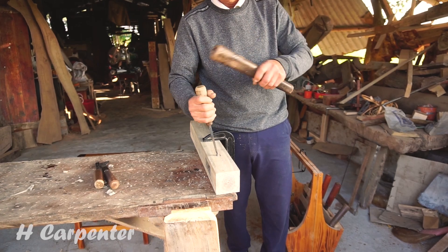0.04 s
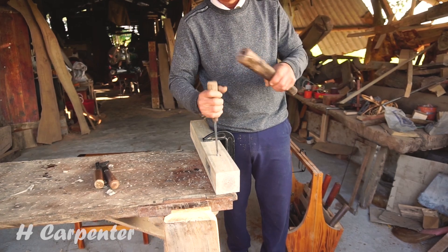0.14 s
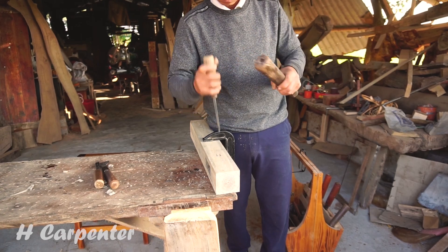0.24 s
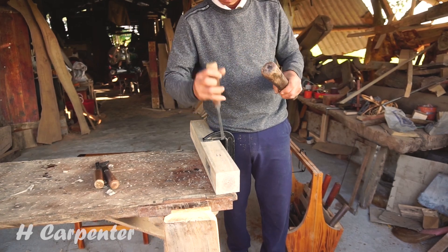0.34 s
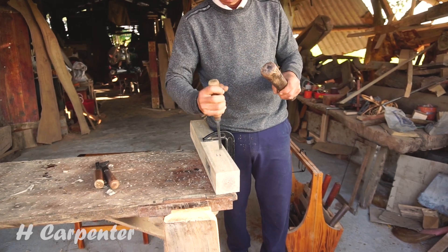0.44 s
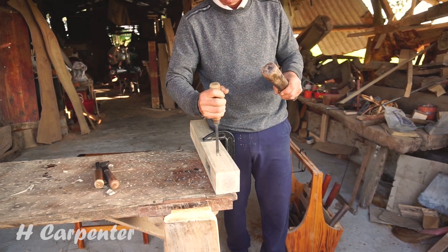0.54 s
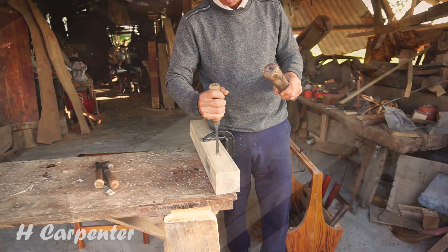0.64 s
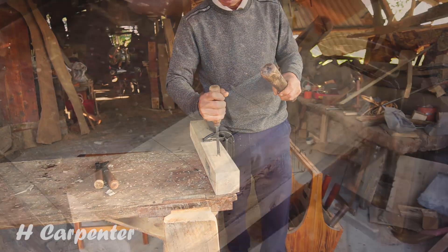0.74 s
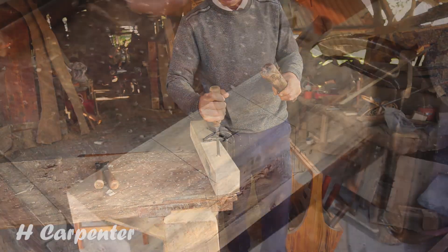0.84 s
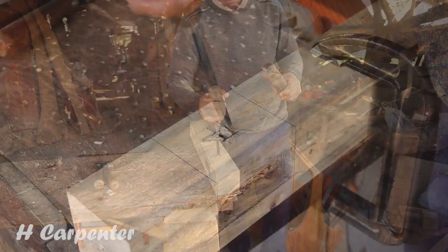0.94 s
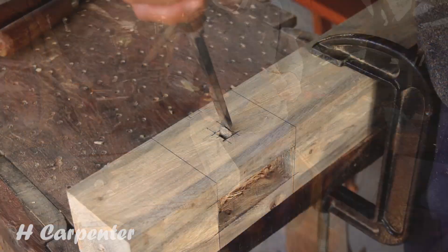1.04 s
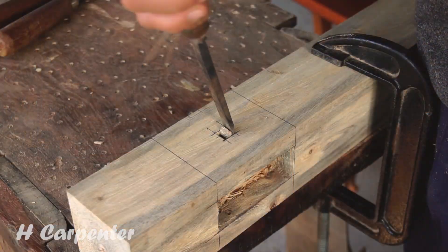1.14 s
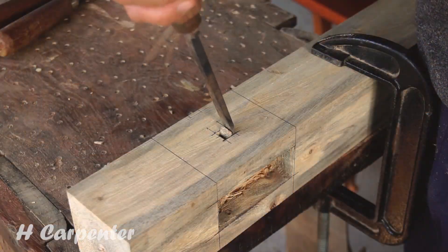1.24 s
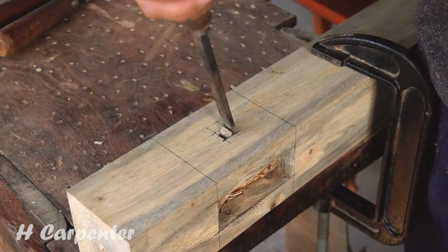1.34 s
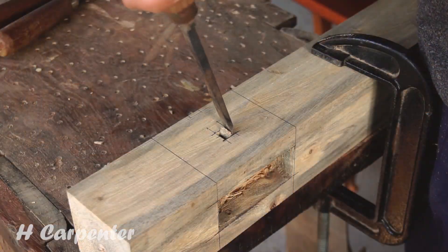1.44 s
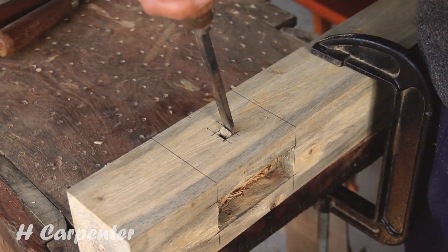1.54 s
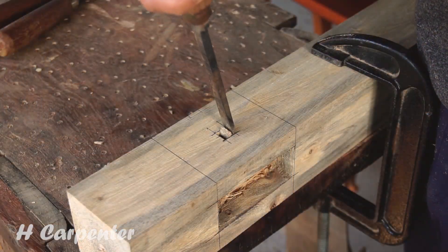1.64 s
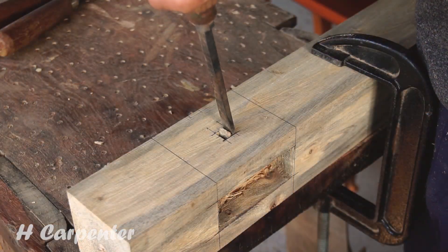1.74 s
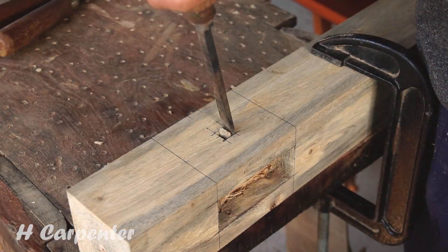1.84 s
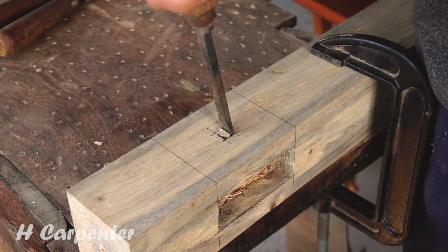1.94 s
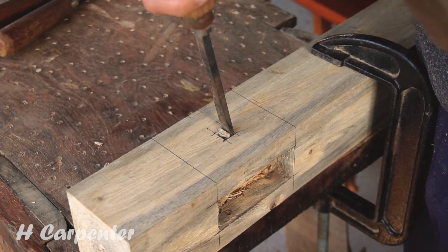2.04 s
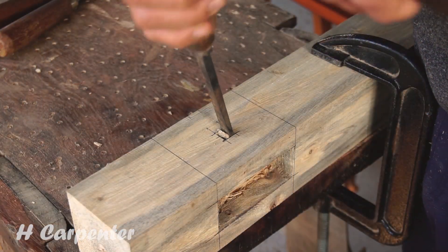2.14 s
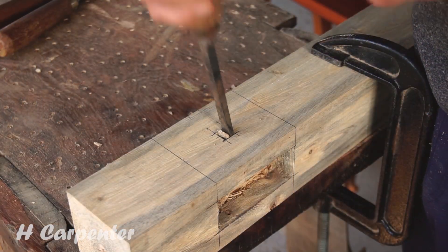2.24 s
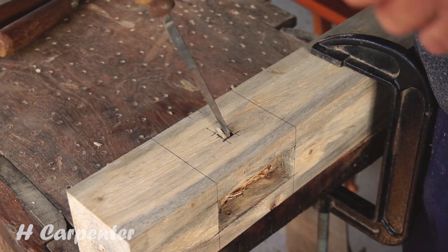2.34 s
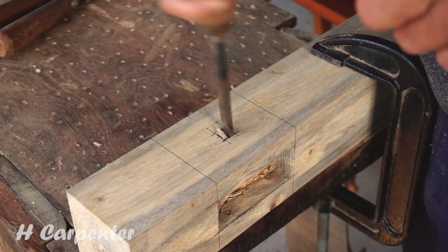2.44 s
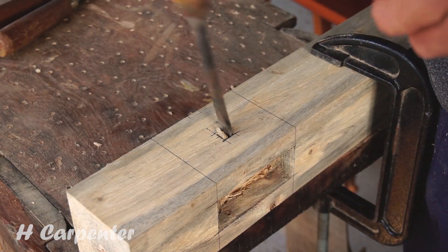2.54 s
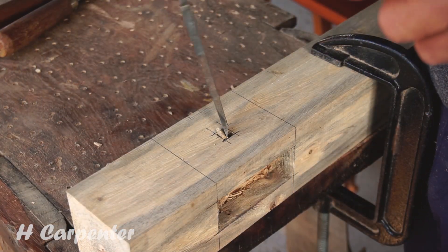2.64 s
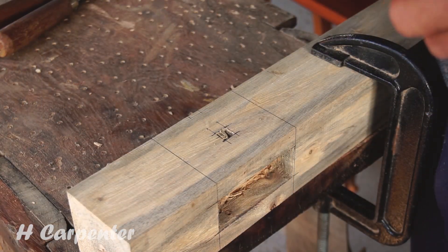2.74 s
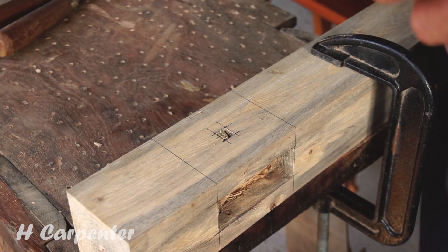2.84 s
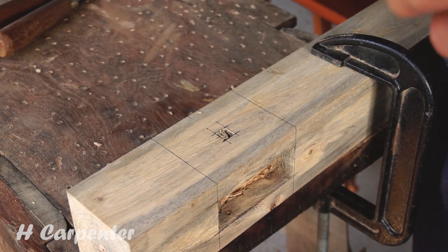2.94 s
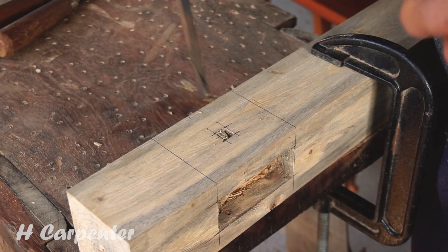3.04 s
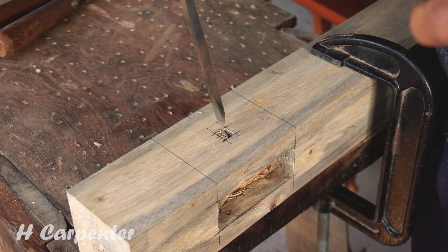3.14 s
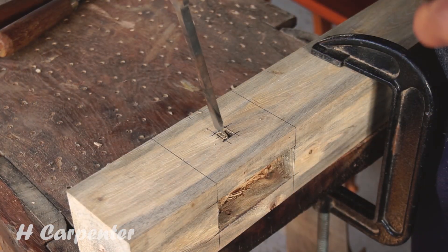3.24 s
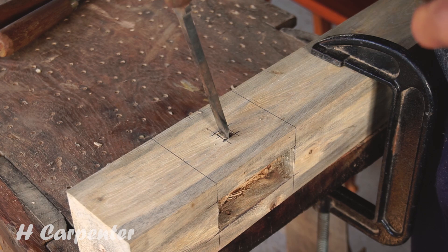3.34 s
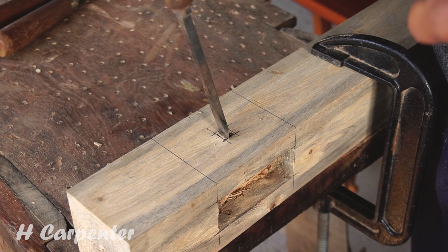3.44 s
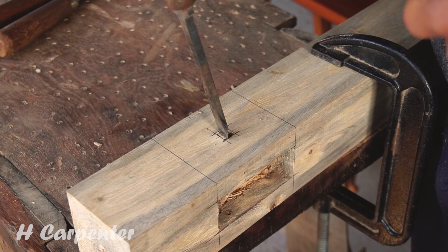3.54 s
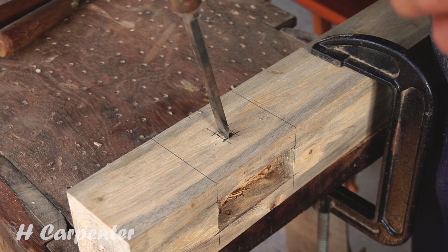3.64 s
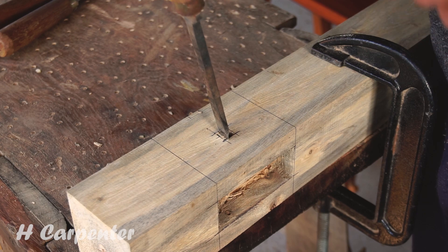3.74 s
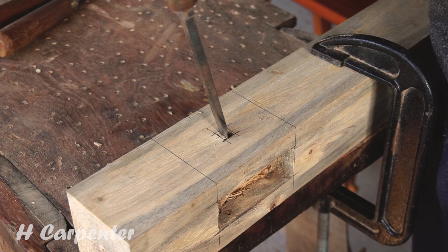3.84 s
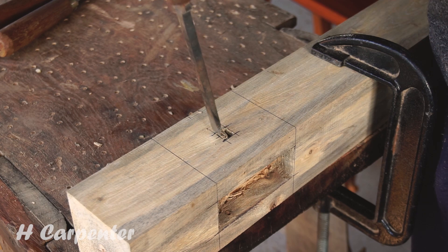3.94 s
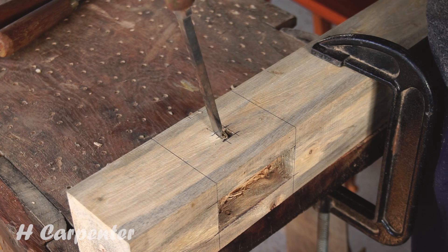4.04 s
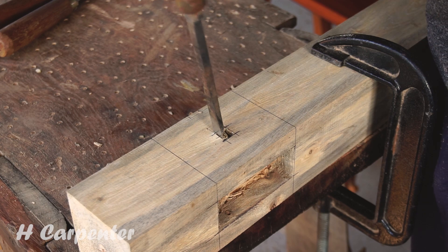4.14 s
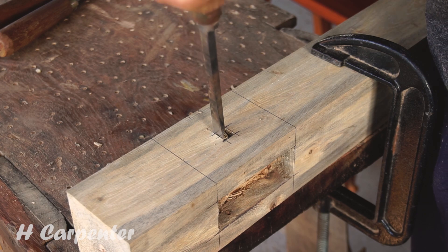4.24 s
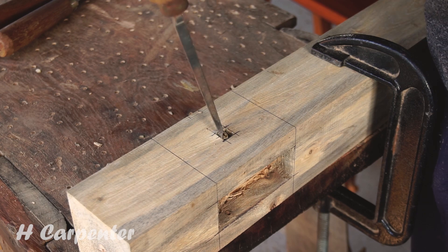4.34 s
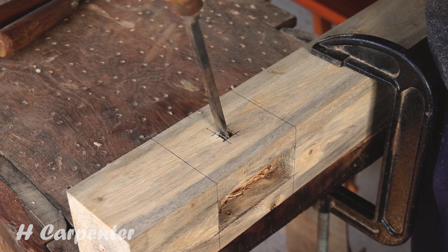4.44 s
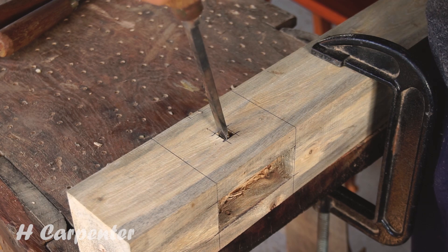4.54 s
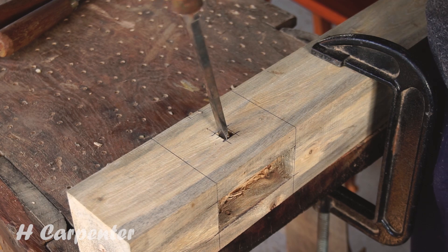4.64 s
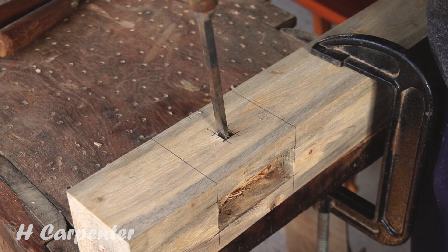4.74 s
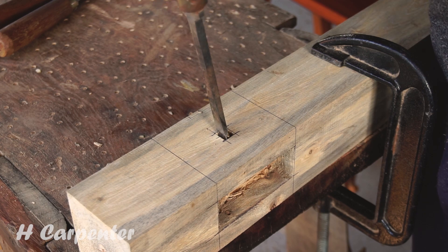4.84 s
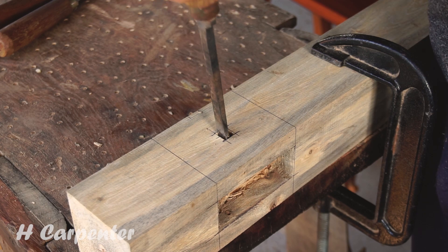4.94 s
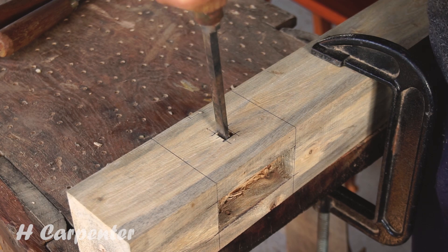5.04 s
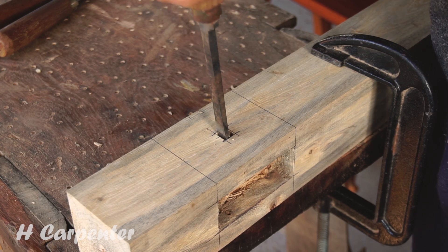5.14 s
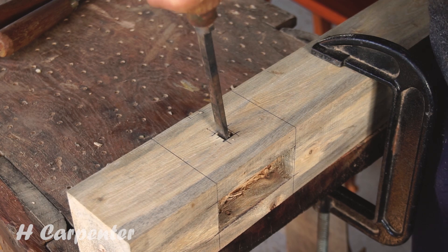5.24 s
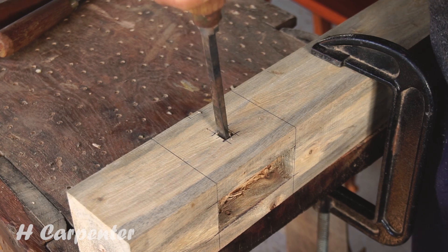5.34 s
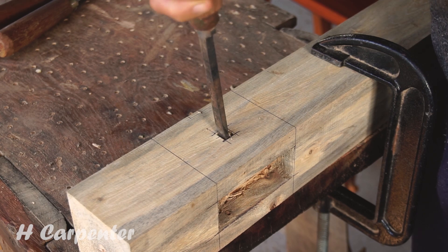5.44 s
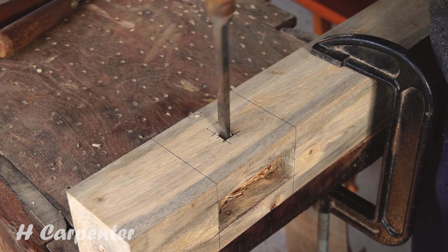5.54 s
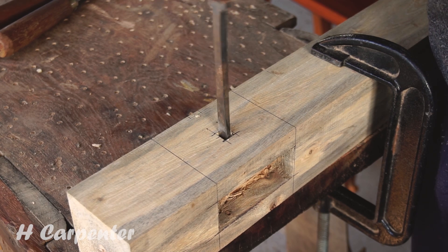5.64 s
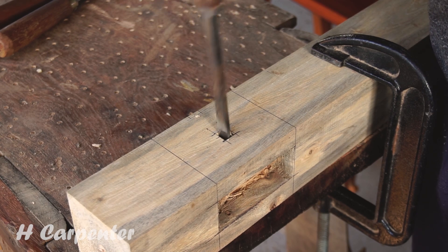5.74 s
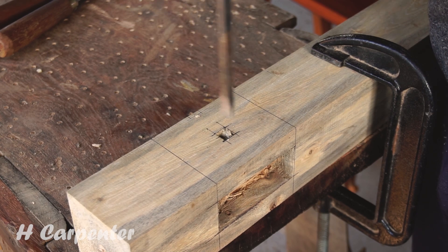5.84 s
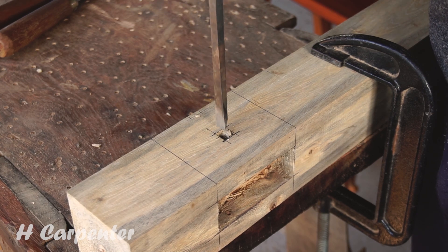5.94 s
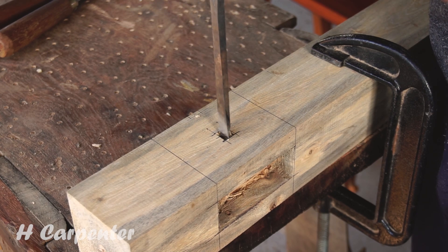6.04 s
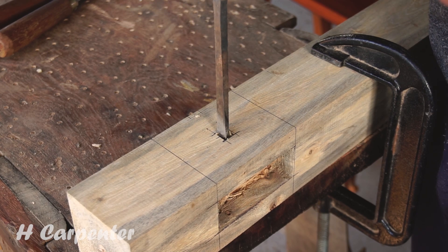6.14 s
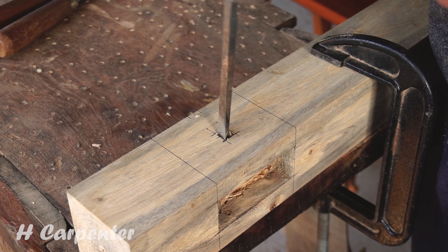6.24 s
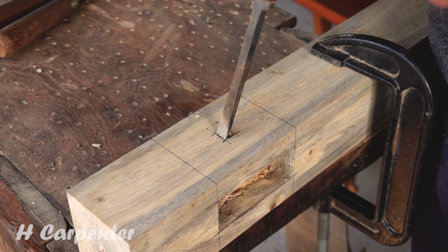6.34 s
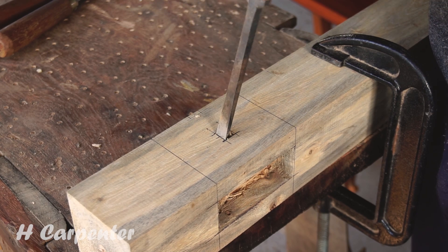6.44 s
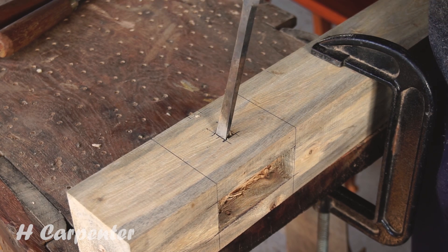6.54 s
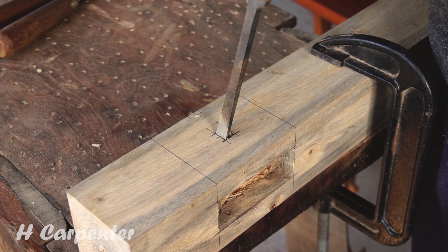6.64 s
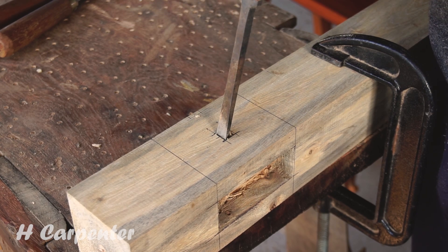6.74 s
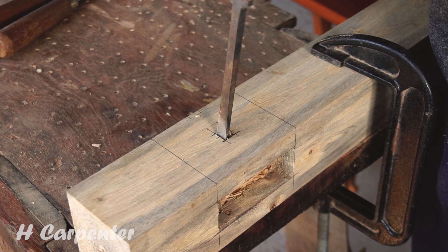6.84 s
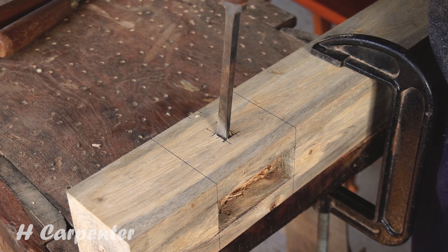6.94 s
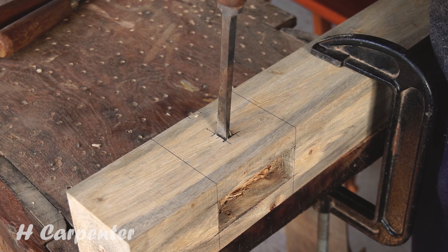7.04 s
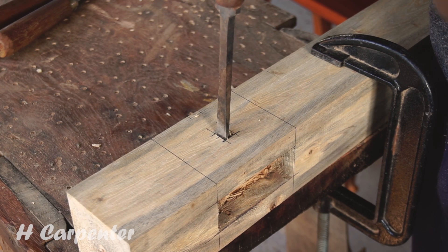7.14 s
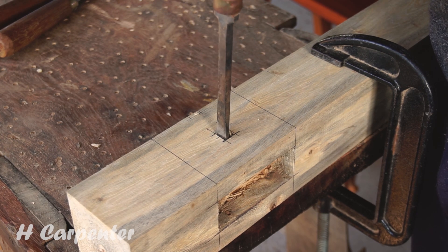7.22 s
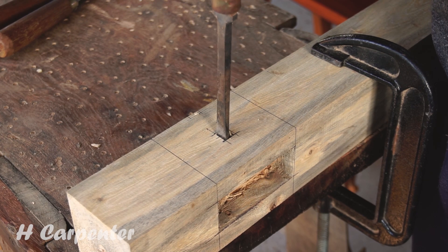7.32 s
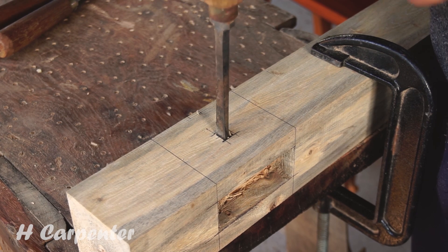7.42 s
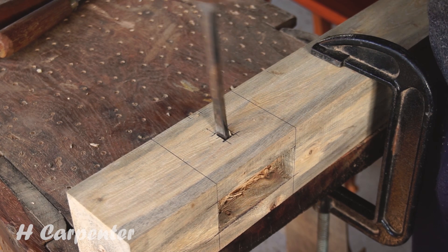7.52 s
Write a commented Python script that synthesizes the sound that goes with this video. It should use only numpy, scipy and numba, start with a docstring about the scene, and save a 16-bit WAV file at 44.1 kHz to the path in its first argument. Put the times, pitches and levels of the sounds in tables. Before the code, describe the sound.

Close in an open wooden barn, the tail of a mallet blow on a chisel rings out, then light ticks and faint scrapes. Three sharp woody cracks follow quickly with a low bench thump, then the blade is loosened with clicks. Another trio comes later, then rustling as the blade is worked, and a last trio. Small birds chirp faintly outside over a soft rumble and hiss.

```python
"""A wooden mallet drives a chisel into a clamped timber on a bench in an open barn, mostly three blows at a time.
Each blow excites damped modes of blade and timber, a noisy crack and rattle, and late, low bench modes.
Between blows the blade is set and levered, as ticks, soft knocks and friction noise. Small birds are gliding
near-sines outside; decaying noise forms the barn's echoes, and filtered noise the distant rumble and hiss.
A microphone's preamp saturates and its limiter holds down each blow."""
import sys
import numpy as np
from scipy import signal
from scipy.io import wavfile
from scipy.ndimage import uniform_filter1d
from numba import njit

SR = 44100
rng = np.random.default_rng(int(sys.argv[2]) if len(sys.argv) > 2 else 0)


def generate_wav(signal):
    """Clip the signal to [-1, 1] and save it as 16-bit WAV at the path in sys.argv[1]."""
    frames = np.transpose(np.atleast_2d(signal))
    scaled = np.clip(frames, -1, 1) * 32767
    pcm = np.round(scaled).astype(np.int16)
    wavfile.write(sys.argv[1], SR, pcm)


N = 334278
LEAD = SR // 4  # samples rendered ahead, for a blow struck just before the start


def undb(db):
    """Logarithmic level: the amplitude gain of a level in dB."""
    return 10 ** (np.asarray(db) / 20)


def band(x, hz, width_hz):
    """Resonant selection: band-pass around hz."""
    low = max(hz - width_hz / 2, hz / 4)
    top = min(hz + width_hz / 2, .45 * SR)
    return signal.sosfilt(signal.butter(2, [low, top], "band", fs=SR, output="sos"), x)


def ring(modes, scatter_db, size):
    """Modal superposition: one impulse starts decaying sines, with random level and slight detuning."""
    t = np.arange(size) / SR
    hz, db, t60 = np.transpose(modes)[:, :, None]
    level_luck, pitch_luck = rng.standard_normal((2, len(modes), 1))
    decay = undb(db + scatter_db * level_luck - 60 * t / t60)
    return np.sum(decay * np.sin(2 * np.pi * hz * (1 + .006 * pitch_luck) * t), axis=0)


def push(ms):
    """Contact stiffness: a smooth force pulse of unit area; longer is duller."""
    force = np.hanning(max(int(ms * SR / 1000), 1) + 2)[1:-1]
    return force / force.sum()


def grains(size, grain, scatter_db):
    """Intermittent contact: noise in short grains of very uneven size, rms 1."""
    sizes = np.minimum(rng.exponential(size=size // grain + 1), 3)
    x = rng.standard_normal(size) * undb(scatter_db * np.repeat(sizes, grain)[:size])
    return x / x.std()


def walk(rate):
    """Slow random modulation: levels held 1 / rate s and smoothed twice."""
    k = int(SR / rate)
    steps = np.repeat(rng.standard_normal(N // k + 1), k)
    return 1.3 * uniform_filter1d(uniform_filter1d(steps, k), k)[:N]


def add(out, s, sound):
    """Linear superposition: mix a sound in at time s."""
    i = LEAD + int(s * SR)
    out[i:i + len(sound)] += sound[:len(out) - i]


# mallet blows: start_s [s], force_db [dB], thump_db of the bench [dB, before a 3 dB cut],
# knock_db of the timber [dB relative to force]
BLOWS = [(-.075, 9, -7, -2), (1.7369, -2, -10, -5.5), (1.970, 4.5, 2, -4.5), (2.1501, 3.5, 0.5, 1),
         (5.0929, -4.5, -7, -2.5), (5.3241, 6.5, 1.5, -6), (5.522, 7.5, 3.5, -3), (7.0266, -11, -7.5, 4),
         (7.2466, 0.5, -7.5, -9), (7.468, 5.5, 3, -3)]
BLADE_DB = 4.5  # against the force


def mallet():
    """Impact excitation: blade, timber and crack sound at once, the rattle builds and the bench swells late."""
    near, spread, bench = np.zeros((3, N + LEAD))
    size = SR // 3
    t = np.arange(size) / SR
    for s, force_db, thump_db, knock_db in BLOWS:
        blade = undb(BLADE_DB) * ring(BLADE, 2.0, size)
        onset = np.clip((t - .0015) / 0.00076, 0, 1)  # the shock takes a moment to reach the timber
        knock = undb(knock_db) * onset * ring(TIMBER, 2.5, size)
        crack = undb(-12 - 60 * t / .012) * rng.standard_normal(size)
        loose = rattle(t)
        direct = blade + knock + crack + undb(-5.5) * loose
        to_barn = undb(-16.5) * blade + undb(-10.5) * knock + undb(-21) * loose
        add(near, s, undb(force_db) * direct)
        add(spread, s, undb(force_db) * to_barn)
        add(bench, s, undb(thump_db - 3) * bench_thump(t))
    return near, spread, bench


# modes of the struck blade: pitch_hz [Hz, nominal], level_db [dB relative], t60_s [s]
BLADE = [(3990, 4, 0.014), (3640, -4, 0.022), (4060, -26, .12), (4800, -14, 0.035), (6284, -6, 0.013),
         (7045, -19, .05), (8600, -30, 0.04), (10900, -21, 0.03)]
RATTLE_S, RATTLE_HOLD = 0.061, 2.3  # time to fall 8 dB; how abruptly the rattle ends
CONTACT_MS = .2
SHIVER_DB, SHIVER_TILT_DB = -11, -7  # blade kept ringing by the rattle; tilt per octave above 4 kHz


def rattle(t):
    """Repeated micro-impacts: fibres tear, loose things hop and land, and the blade is kept ringing."""
    hops = grains(len(t), grain=60, scatter_db=3.2)
    hops = hops * undb(-8 * (t / RATTLE_S) ** RATTLE_HOLD) * np.minimum(t / 0.012, 1)
    shiver = 0
    for hz, _, _ in BLADE:
        mode_db = 4.5 * rng.standard_normal() + SHIVER_TILT_DB * np.log2(hz / 4000)
        shiver = shiver + undb(mode_db) * band(hops, hz, 160)
    softened = np.convolve(hops, push(CONTACT_MS))[:len(t)]
    hiss = undb(-23.0) * band(hops, 9800, 5700) + undb(-30.5) * hops
    return softened + undb(SHIVER_DB) * shiver + hiss


# modes of the bench: pitch_hz [Hz, nominal], level_db [dB relative], t60_s [s]
BENCH = [(123.9, 3, 0.35), (106.4, -5.5, 0.35), (166.6, -12, 0.47), (210.3, -9, 0.38)]


def bench_thump(t):
    """Delayed structural response: low bench modes swell after the blow."""
    swell = np.clip((t - .025) / 0.058, 0, 1) ** 2
    return swell * ring(BENCH, 1.5, len(t))


# the blade set down, knocked or rebounding: start_s [s], ring_db [dB], pitch_hz of the ring [Hz, nominal],
# click_db [dB relative], knock_db of the timber [dB relative], knock_hz, its colour [Hz]
TAPS = [(0.2189, -43, 3700, -54, -51, 231), (0.5082, -38, 2480, -49, -41, 326),
        (1.222, -39, 3360, -37, -37, 248), (1.262, -43, 6200, -35, -45, 304),
        (1.786, -24, 4790, -28, -19.5, 420), (2.1028, -22.5, 5250, -23, -44, 813),
        (2.2082, -6.5, 2520, -37, -20, 415), (2.7921, -22.5, 6440, -32, -29.5, 1340),
        (2.7994, -11, 2990, -15, -27.5, 590), (3.182, -46, 7100, -42, -54, 231),
        (3.5186, -46, 3650, -43, -48, 342), (3.533, -46, 3700, -57, -51, 353),
        (3.914, -42.5, 3710, -44, -39, 253), (4.345, -37, 3560, -37, -37.5, 240),
        (4.6121, -23.5, 3570, -25.5, -17, 308), (4.807, -33, 3610, -33.5, -21, 423),
        (4.946, -35, 4330, -24, -30.5, 250), (5.5598, -19, 4010, -32, -19, 1380),
        (5.8059, -41, 3830, -58, -36, 240), (5.8263, -34, 3700, -46, -31, 444)]
# modes of the timber, also struck by the mallet: pitch_hz [Hz, nominal], level_db [dB relative], t60_s [s]
TIMBER = [(234.8, -11.5, 0.12), (357.6, -32, 0.018), (467.4, -3, 0.047), (628.4, -1, 0.046),
          (758.4, -17, 0.065), (834, 4.5, 0.022), (1070, 2.5, 0.042), (1210, -1, 0.052),
          (1399, 15.5, 0.013), (1660, 5, 0.027), (1723, -10, 0.13), (2024, 9, 0.015), (2366, 4.5, 0.02),
          (3250, -21.5, 0.0322)]
TICK_T60_S = 0.014
TICK_TAIL_DB, TICK_TAIL_T60_S = -15.5, 0.064  # each tick rings on faintly
CHATTER_S, CHATTER_DB = 0.021, -12.5  # time to fall 8 dB; level against the ring


def ticks():
    """Light contact: small rings and clicks, with chatter convolved through the timber's modes."""
    out, rub = np.zeros((2, N + LEAD))
    size = SR // 6
    t = np.arange(size) / SR
    for s, db, hz, click_db, knock_db, knock_hz in TAPS:
        click = undb(click_db - 60 * t / 0.01) * band(rng.standard_normal(size), 5500, 9500)
        chatter = grains(size, grain=60, scatter_db=2.0) * undb(-8 * (t / CHATTER_S) ** 2)
        drive = chatter / np.sqrt(CHATTER_S * SR)
        timber = signal.fftconvolve(drive, ring(TIMBER, 2.5, size))[:size]
        knock = band(timber, knock_hz, 0.99 * knock_hz) + undb(-8) * band(timber, 1400, 450)
        modes = [(hz, 0, TICK_T60_S), (hz, TICK_TAIL_DB, TICK_TAIL_T60_S)]
        add(out, s, undb(db) * ring(modes, 0., size) + click + undb(knock_db) * knock)
        add(rub, s, undb(db + CHATTER_DB) * band(chatter, 3000, 5007))
    return out, rub


SCRAPE_WIDTH_HZ = 7000
SCRAPE_WOOD_HZ, SCRAPE_WOOD_DB = 1450, 8  # the timber hums under the blade


def grit(n, hz):
    """Dry friction: grainy noise around hz with a quick start, rms 1."""
    x = grains(n, grain=120, scatter_db=3.0) * np.minimum(np.arange(n) / (.003 * SR), 1)
    x = band(x, hz, SCRAPE_WIDTH_HZ) + undb(SCRAPE_WOOD_DB) * band(x, SCRAPE_WOOD_HZ, 400)
    return x / x.std()


# the blade scraping and chips tearing: start_s [s], length_s [s], level_db [dB relative], centre_hz [Hz]
SCRAPES = [(0.399, 0.049, -63, 8500), (0.491, 0.061, -57.5, 3040), (0.954, 0.17, -60, 4870),
           (1.632, 0.022, -49, 10500), (2.336, 0.044, -47.5, 7700), (2.434, .03, -61.5, 7000),
           (2.51, 0.034, -58, 6800), (2.628, 0.059, -58.5, 3870), (2.726, 0.057, -57.5, 3930),
           (3.184, 0.024, -59, 10080), (4.45, 0.066, -51.5, 4960), (5.055, 0.005, -56, 9000),
           (5.797, 0.047, -54, 4000), (6.123, .04, -58.5, 2960), (6.245, .04, -62.5, 4000),
           (6.5, 0.037, -54, 3990), (6.591, .04, -56, 3000), (6.68, 0.056, -53, 3000),
           (6.776, 0.055, -56.5, 4440), (6.9, 0.036, -54, 3500), (6.995, 0.022, -50.5, 4000)]
# the blade worked about in the hole, a ragged rustle
WORK_S, WORK_END_S, WORK_DB, WORK_HZ, WORK_RAGGED_DB = 6.0, 7.1, -66.5, 4500, 4


def scraping():
    """Sliding friction: short fading scrapes, and a long rustle of wandering level."""
    out = np.zeros(N + LEAD)
    for s, length, db, hz in SCRAPES:
        n = int(length * SR)
        add(out, s, undb(db) * grit(n, hz) * np.linspace(1, .6, n))
    n = int((WORK_END_S - WORK_S) * SR)
    level = undb(WORK_DB + WORK_RAGGED_DB * walk(25.2)[:n]) * np.hanning(n) ** 0.19
    add(out, WORK_S, level * grit(n, WORK_HZ))
    return out


# resonances of the loose blade: pitch_hz [Hz], width_hz [Hz], level_db [dB relative]
LOOSE_BLADE = [(1420, 300, 0), (3550, 700, -2), (5150, 600, -3), (6300, 700, -2), (7500, 900, -6),
               (9600, 900, -5), (11500, 1500, -5)]
SCRAPE_RING_DB = -3  # share of a scrape that passes through the loose blade


def handling():
    """Forced resonance: chatter and scrapes are heard directly and through the loose blade."""
    out, chatter = ticks()
    scrapes = scraping()
    rub = chatter + undb(SCRAPE_RING_DB) * scrapes
    blade = sum(undb(db) * band(rub, hz, width_hz) for hz, width_hz, db in LOOSE_BLADE)
    return out + undb(-2.5) * scrapes + undb(0.5) * rub + blade


# soft hollow knocks: start_s [s], level_db [dB relative], pitch_hz [Hz, nominal]
THUDS = [(0.518, -35.5, 350), (0.838, -31.5, 239), (2.137, -20.5, 1110), (2.664, -34, 585),
         (3.35, -37, 570), (3.919, -30.5, 276), (4.087, -33, 550), (4.997, -33, 560), (6.069, -38, 570),
         (7.001, -24.5, 1130)]
THUD_T60_S = 0.095


def thuds():
    """Soft-contact excitation: a smooth push starts a damped pair of modes."""
    out = np.zeros(N + LEAD)
    for s, db, hz in THUDS:
        body = ring([(hz, 0, THUD_T60_S), (0.62 * hz, -5, THUD_T60_S)], 0., SR // 6)
        add(out, s, undb(db) * np.convolve(body, push(0.8)))
    return out


# bird notes: start_s [s], length_s [s], first_hz [Hz], last_hz [Hz], level_db [dB relative]
BIRDS = [(.12, 0.13, 5500, 5500, -66), (.27, 0.023, 3360, 3240, -55), (.31, 0.034, 8800, 6840, -53.5),
         (.33, 0.095, 6310, 6100, -55.5), (.36, 0.085, 5500, 5380, -61), (.76, 0.037, 4600, 4350, -65),
         (1.1, 0.11, 5080, 3430, -50.5), (3.59, 0.08, 7500, 7440, -60), (3.75, 0.055, 9200, 6870, -66),
         (3.84, 0.09, 4800, 4000, -62.5), (3.94, .13, 5060, 3420, -50), (6.95, .06, 2840, 2680, -55)]
# thin, slightly falling notes from one bird: start_s [s], first_hz [Hz], level_db [dB relative]
SONG = [(5.74, 8070, -56), (5.86, 8150, -55), (5.97, 8100, -54.5), (6.15, 8150, -51.5), (6.31, 8150, -47.5),
        (6.48, 7900, -47.5), (6.621, 7360, -56), (6.85, 7600, -49.5)]
SONG_NOTE_S, SONG_FALL_HZ = 0.0494, 373
# faint low hoots far off: start_s [s], length_s [s], first_hz [Hz], last_hz [Hz], level_db [dB relative]
HOOTS = [(.33, 0.033, 537, 437, -49), (.55, 0.067, 470, 421, -62), (1.15, 0.2, 336, 302, -55),
         (3.42, 0.2, 348, 325, -57), (4.14, 0.098, 633, 466, -57), (5.98, 0.36, 406, 426.5, -57.5),
         (6.4, 0.15, 346, 319, -57)]
FLUTTER_OF_PITCH, FLUTTER_OF_GLIDE = 0.0084, 0.178  # shares


def calls():
    """Frequency modulation: gliding near-sines whose pitch flutters."""
    out = np.zeros(N + LEAD)
    song = [(s, SONG_NOTE_S, hz, hz - SONG_FALL_HZ, db) for s, hz, db in SONG]
    for s, length, first_hz, last_hz, db in BIRDS + song + HOOTS:
        flutter_hz = FLUTTER_OF_PITCH * first_hz + FLUTTER_OF_GLIDE * abs(first_hz - last_hz)
        n = int(length * SR)
        flutter = uniform_filter1d(rng.standard_normal(n), 60)
        hz = np.linspace(first_hz, last_hz, n) + flutter_hz * flutter / flutter.std()
        tone = np.sin(2 * np.pi * np.cumsum(hz) / SR)
        add(out, s, undb(db) * np.sqrt(np.hanning(n) * 2) * tone)
    return out


# the barn's reverberation: centre_hz [Hz], t60_s [s], level_db [dB relative]
BARN = [(103.2, 0.5, -0.5), (296, 0.25, 6), (950, 0.2, 3.5), (2390, 0.29, -7), (5000, 0.28, -9.5),
        (9000, 0.4, -12), (14000, 0.098, -38.5)]


def barn(build_ms=6.1, even_s=0.023):
    """Diffuse reverberation: dense echoes, even at first, then dying band by band; unit energy."""
    t, echo = np.arange(SR // 2) / SR, 0
    hz, t60_s, level_db = np.transpose(BARN)
    for f in 90 * 2 ** np.arange(0, 7.6, .5):
        t60 = np.interp(np.log(f), np.log(hz), t60_s)
        db = np.interp(np.log(f), np.log(hz), level_db)
        decay = undb(db - 60 * np.maximum(t - even_s, 0) / t60)
        echo = echo + band(rng.standard_normal(len(t)), f, f * 0.33) * decay
    echo = echo * (1 - np.exp(-t * 1000 / build_ms))
    return echo / np.sqrt(np.sum(echo ** 2))


# background: start_s [s], level_db [dB], treble_lift_db [dB]
AMBIENCE = [(0, -34.5, 0.5), (.5, -39.5, 8), (1.599, -36, 7.5), (2.999, -36.5, 3.5), (6, -36.5, 4.5),
            (6.6, -38, 8.5), (7.58, -33.5, 2.5)]
# background spectrum: pitch_hz [Hz], density_db [dB per Hz, relative]
AIR = [(12, -44), (20, -26.5), (74, 3.5), (113, -8.5), (246, -18), (275, -19.5), (316, -19), (584, -21),
       (1590, -35), (2230, -43.5), (3680, -52), (4350, -52), (7390, -55.5), (15700, -66)]
DROPOUT_S, DROPOUT_WIDTH_S, DROPOUT_DB = .889, .01, -22  # the background dips for an instant
# a deep rumble grows until the dip, then drops to a lower level
DEEP_DB, DEEP_RISE_DB_PER_S, DEEP_AFTER_DB = -45, 18, -56.5


def ambience():
    """Spectral shaping: rumble and hiss in half-octave bands that swell together and flicker alone."""
    s, *columns = np.transpose(AMBIENCE)
    t = np.arange(N) / SR
    db, lift_db = (np.interp(t, s, c) for c in columns)
    gap_db = DROPOUT_DB * np.clip(1 - abs(t - DROPOUT_S) / DROPOUT_WIDTH_S, 0, 1)
    deep_db = np.where(t < DROPOUT_S, DEEP_DB + DEEP_RISE_DB_PER_S * t, DEEP_AFTER_DB)
    deep_db = uniform_filter1d(deep_db, size=400)
    out, swell, (hz, colour) = 0, walk(1.0), np.transpose(AIR)
    for f in 24 * 2 ** np.arange(0, 9.6, .5):
        treble = np.clip(np.log2(f / 500) / 3, 0, 1)
        colour_db = np.interp(np.log(f), np.log(hz), colour)
        band_db = colour_db + lift_db * treble + .6 * swell + 1.5 * walk(12)
        out = out + undb(band_db) * band(rng.standard_normal(N), f, f * 0.37)
    deep = band(rng.standard_normal(N), 22, 12)
    return undb(gap_db) * (undb(db) * out / out.std() + undb(deep_db) * deep / deep.std())


def scene():
    """Direct and reverberant fields: bench sounds and birds, each with echoes, over the background."""
    near, spread, bench = mallet()
    hands, birds, echo = handling() + thuds(), calls(), barn()
    # taps, scrapes and soft knocks at the bench have a shorter echo
    short_echo = echo * undb(-60 * np.arange(len(echo)) / SR / 0.12)
    wet = signal.fftconvolve(spread + undb(-2.5) * birds, echo)
    wet = wet + undb(-5.0) * signal.fftconvolve(hands, short_echo)
    mix = near + hands + bench + undb(-3.5) * birds + wet[:N + LEAD]
    return (mix[LEAD:] + ambience())[None]


@njit
def limiter(x, top, attack, release, slope):
    """Dynamic range compression: gain falls as the peak envelope rises above the threshold."""
    y, e = np.empty(len(x)), abs(x[0])
    for i in range(len(x)):
        a = abs(x[i])
        e += (a - e) * (attack if a > e else release)
        y[i] = x[i] * (top / max(e, top)) ** slope
    return y


TOP_HZ = 15700


def record(dry):
    """Nonlinear transduction: the preamp saturates, a limiter follows, the converter clips, the top is cut."""
    rail, attack_s, release_s, slope = undb(9), .0025, .025, .9
    saturated = rail * np.tanh(dry[0] / rail)
    held = limiter(saturated, undb(-8.5), 1 / (attack_s * SR), 1 / (release_s * SR), slope)
    clipped = np.clip(held, -.97, .97)
    return signal.sosfilt(signal.ellip(8, .2, 70, TOP_HZ, fs=SR, output="sos"), clipped)[None]


dry = scene()
out = record(dry)
generate_wav(out)
```